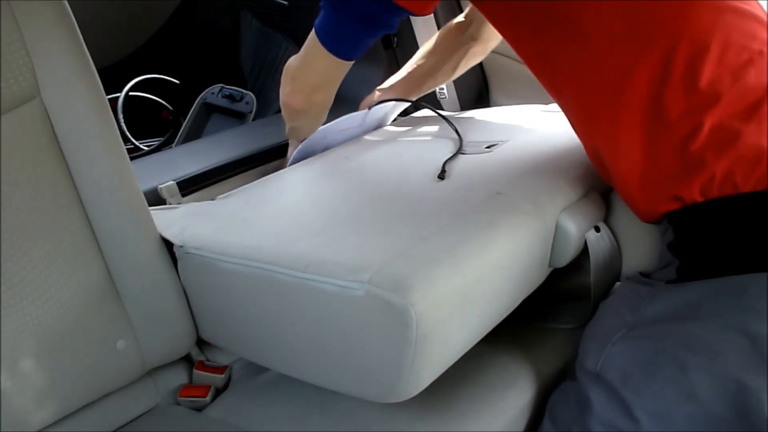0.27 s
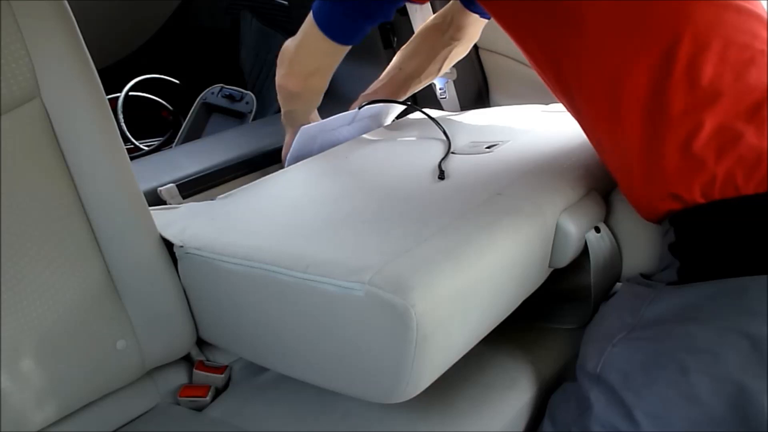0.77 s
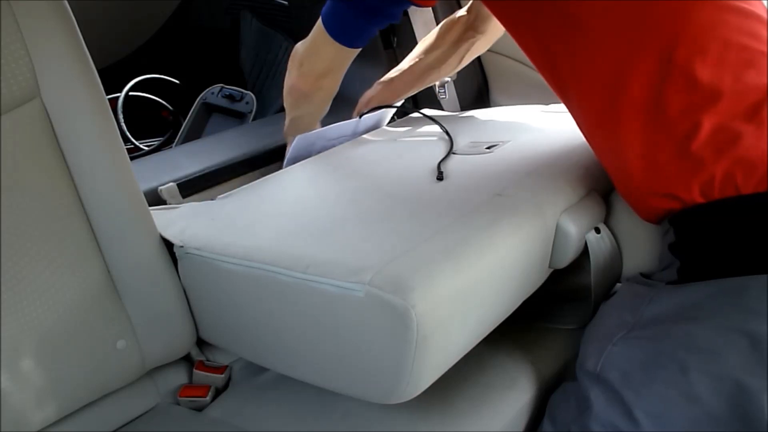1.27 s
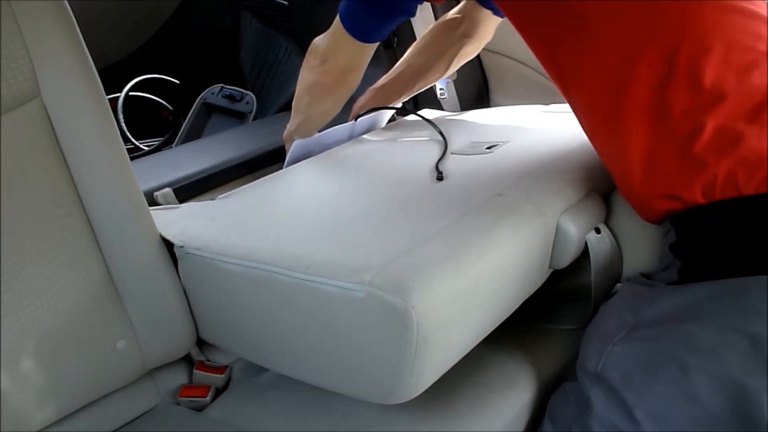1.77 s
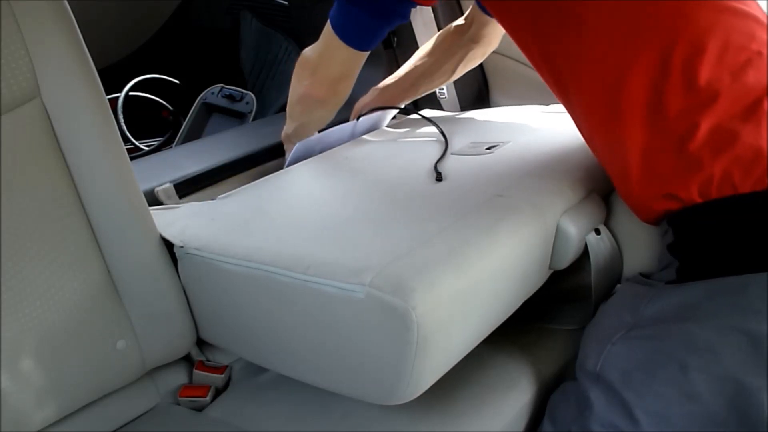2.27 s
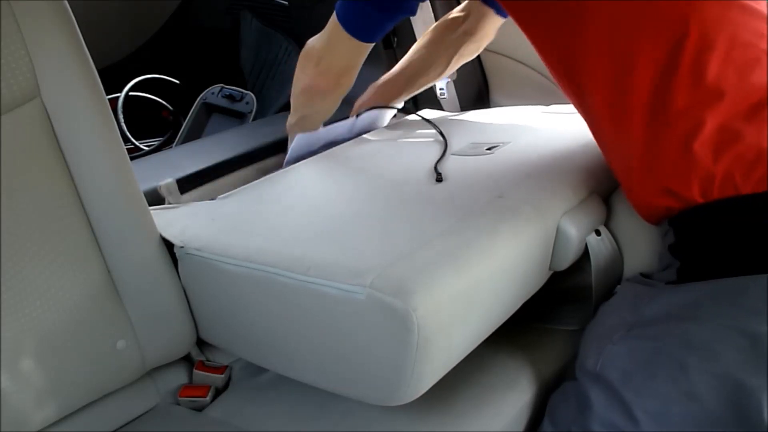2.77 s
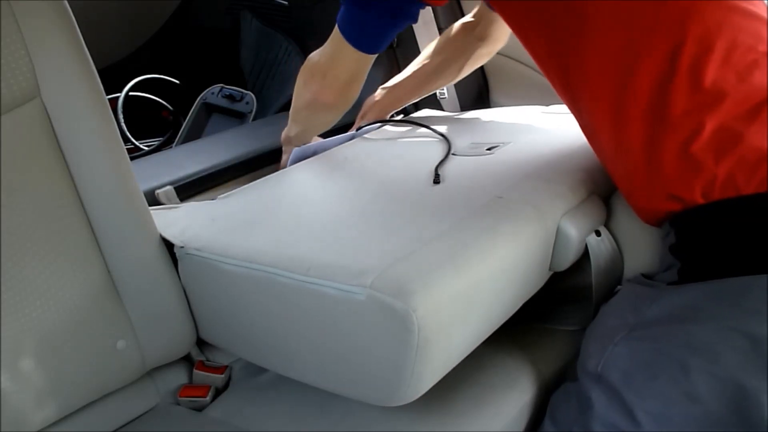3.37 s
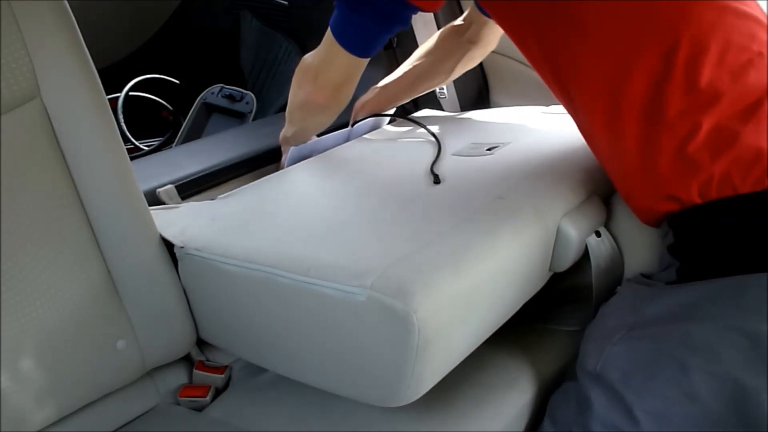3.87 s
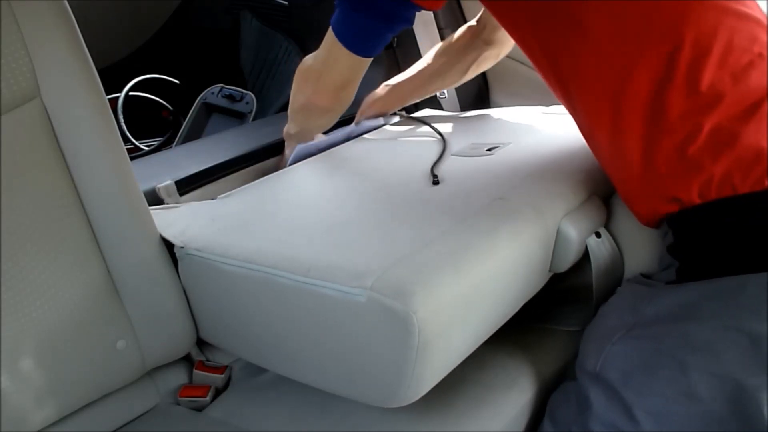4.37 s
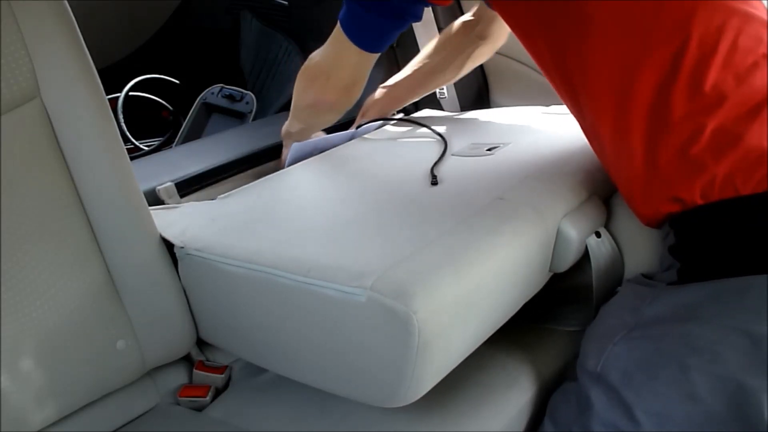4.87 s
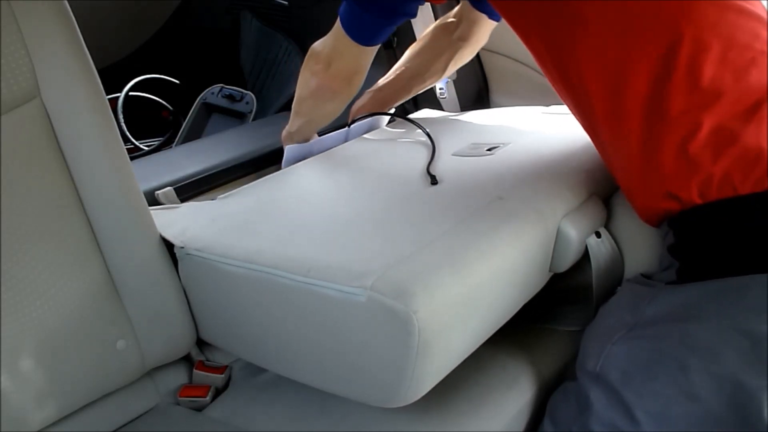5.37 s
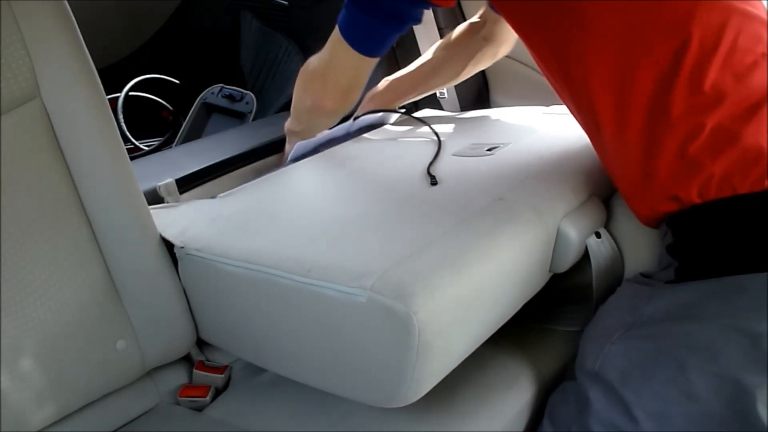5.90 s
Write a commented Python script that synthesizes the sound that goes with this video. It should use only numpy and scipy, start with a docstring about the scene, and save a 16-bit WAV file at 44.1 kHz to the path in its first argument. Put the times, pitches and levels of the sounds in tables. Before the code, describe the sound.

Cloth rubs and rustles over foam in quick strokes, with scattered bumps and plastic clacks over a low car cabin rush.

```python
"""Inside a parked car, hands work a padded heating element under the fabric cover of a seat.
From the start, short shoves drag cloth over foam with a swish and a dull rumble. Early on the seat is
bumped often: the cushion thuds, its plastic trim clacks and small parts tick. Between about 1 and 3 s,
fingers zip over the weave now and then. The hardest knock comes at 4.4 s and another strong one at 6 s,
just before the end. A steady low rush and hiss fill the cabin throughout."""
import sys
import numpy as np
from scipy import signal
from scipy.fft import rfft, irfft, next_fast_len
from scipy.io import wavfile

SR = 44100
rng = np.random.default_rng(int(sys.argv[2]) if len(sys.argv) > 2 else 0)


def digitize_waveform(pressure):
    """Quantize a signal to 16-bit integers and store it at the path in sys.argv[1].

    Rows of a 2-D input are taken as channels; values are limited to [-1, 1].
    """
    field = np.atleast_2d(pressure).T
    bounded = np.clip(field, -1, 1)
    quanta = np.round(bounded * 32767).astype(np.int16)
    wavfile.write(sys.argv[1], SR, quanta)


N = 270774
TIME = np.arange(N) / SR

# Levels are relative: the functions add their own gains. t60 is the time a sound takes to fade by 60 dB.
# shoves of the pad: start/s, end/s, fastest point/share of the shove, swish/dB, rumble/dB
SHOVES = [(-0.05, 0.106, 0.58, -48.5, -44), (0.159, 0.292, 0.54, -50.5, -45),
          (0.351, 0.476, 0.49, -57.5, -54), (0.453, 0.676, 0.14, -57.5, -51),
          (0.663, 0.824, 0.48, -53, -46.5), (0.84, 0.949, 0.74, -54.5, -55), (0.975, 1.135, 0.59, -53, -44),
          (1.145, 1.27, 0.37, -59, -45), (1.26, 1.434, 0.56, -57, -48.5), (1.46, 1.617, 0.5, -56, -57),
          (1.556, 1.747, 0.55, -55.5, -49), (1.783, 1.919, .3, -51.5, -49.5),
          (1.942, 2.141, 0.56, -51, -47), (2.151, 2.265, 0.59, -52.5, -47.5),
          (2.283, 2.467, 0.25, -52.5, -57), (2.467, 2.554, 0.64, -52.5, -56.5),
          (2.576, 2.685, 0.76, -52, -50.5), (2.734, 2.911, 0.56, -48, -48.5),
          (2.902, 2.984, 0.35, -57.5, -46.5), (3.029, 3.199, 0.75, -49.5, -50.5),
          (3.228, 3.32, 0.45, -52.5, -52), (3.349, 3.466, 0.46, -50, -45.5),
          (3.504, 3.586, 0.61, -50.5, -49.5), (3.618, 3.733, 0.59, -51, -46), (3.75, 3.853, 0.73, -56, -48),
          (3.869, 3.978, 0.62, -54.5, -46), (4.01, 4.112, 0.75, -60.5, -61), (4.16, 4.245, 0.44, -57, -50),
          (4.277, 4.39, 0.46, -52, -50), (4.34, 4.53, 0.46, -51, -46.5), (4.585, 4.785, 0.46, -56.5, -48),
          (4.83, 5.007, 0.67, -53, -50.5), (5.067, 5.153, 0.53, -55, -49.5), (5.177, 5.3, 0.41, -54.5, -47),
          (5.397, 5.554, 0.8, -63.5, -52), (5.568, 5.676, 0.72, -56, -55.5), (5.704, 5.786, 0.55, -54, -50),
          (5.849, 6.009, 0.57, -51, -52), (6.001, 6.064, 0.55, -53.5, -56),
          (6.066, 6.187, 0.39, -53.5, -59)]
# tone of the sliding cloth: f/Hz, level/dB
CLOTH_SPECTRUM = [(250, -14.5), (450, 3), (650, 9), (900, 3.5), (1300, 1), (2000, 0), (2800, -1),
                  (3300, -2), (4300, -2.5), (5300, -5), (6500, -7), (7600, -21.5)]
# tone of the foam and frame rumbling under the hands: f/Hz, level/dB
FOAM_SPECTRUM = [(32, -32.5), (50, -14.5), (90, 1.5), (140, -4), (200, 3.5), (280, 0.5), (400, -4.5),
                 (700, -16)]
# bumps against the seat: t/s, thud f/Hz, thud/dB, trim clack/dB, cloth snap/dB, deep boom/dB,
# hardness of the contact/(dB per octave), ring time/multiple of the usual
SEAT_BUMPS = [(0.007, 211, -36.5, -69, -63, -38, -6.5, 1.0), (0.034, 78.5, -42, -59, -50, -35.5, -5, 1.0),
              (0.1092, 180, -45, -49, -43.5, -51, 12, 0.9), (0.225, 198, -47.5, -57, -62, -48, -4, 1.0),
              (0.43, 193, -46.5, -58, -67, -50, -1, .8), (0.473, 191, -44, -42, -48.5, -40.5, -3, 1.0),
              (0.575, 201, -39.5, -48, -70, -38, -3, .8), (0.751, 209, -40, -50, -47, -36.5, -8.5, 1.3),
              (0.938, 191, -43, -62, -78, -59, -4, 1.2), (1.01, 209, -40.5, -62, -60, -48.5, -2, 1.4),
              (1.081, 184, -40.5, -64, -50.5, -51, 1, 1.0), (1.185, 187, -34.5, -40, -48, -33.5, 2.5, .85),
              (1.212, 184, -40, -40, -52, -43, 8, .8), (1.2225, 187, -43, -51, -53, -48, 1, .8),
              (1.3305, 180, -36, -48, -46, -32.5, 6.5, 1.15), (1.3323, 235, -42, -33, -54, -46, 5, .55),
              (1.341, 236, -48, -52, -51, -52.5, 7, .8), (2.341, 196, -42.5, -43.5, -48, -50, -5, .8),
              (2.423, 183, -41.5, -40.5, -51, -37.5, 4, .6), (2.841, 222, -42.5, -60, -66, -47, -2, 1.2),
              (2.881, 190.7, -32.5, -45, -65, -33.5, -13, 1.0), (2.889, 140, -39, -60, -68, -42, -7, .8),
              (3.686, 178, -44.5, -45, -58, -52, 4, 1.0), (3.963, 194.4, -41.5, -49, -41.5, -39.5, 3, 1.0),
              (4.4192, 197, -25, -21, -44, -43, -2, .42), (4.436, 201, -48, -33, -58, -50, 1, .55),
              (4.443, 186, -36, -36, -46, -42, -1, .45), (5.315, 137, -51, -63, -60, -43, -8, 1.4),
              (5.931, 188, -44, -50, -59, -41.5, -4, .7), (6.0341, 198, -27, -41, -46, -28, -5, 1.1),
              (6.036, 116, -40, -29.5, -56, -41, 4, .6), (6.062, 200, -41, -45.5, -62, -40, 0, .7)]
# ringing tones of the cushion on its frame: f/multiple of the thud pitch, level/dB, usual t60/s
CUSHION_TONES = [(.47, -26.5, 0.15), (.65, -8, 0.15), (1.0, 3, 0.13), (1.22, -10, 0.22), (1.76, -2, 0.096)]
# ringing tones of the plastic trim: f/Hz, level/dB, usual t60/s
TRIM_TONES = [(458, -5.5, 0.05), (523, -3, 0.059), (604.7, 1.5, 0.081), (670, -6, 0.054), (790, -5, 0.059),
              (910, -5.5, 0.041), (1110, -7, 0.03), (1345, -7.5, 0.031), (1590, -10.5, 0.039),
              (1800, -9, 0.02)]
# tone of a bump's cloth snap, cabin boom and trim rattle: f/Hz, level/dB
SNAP_SPECTRUM = [(1000, 2), (2500, 0), (3600, -2), (5300, 0), (7600, -8)]
BOOM_SPECTRUM = [(38, -16), (60, -2.0), (90, 9.5), (125, 5.0), (200, 0.0), (400, -10.0)]
RATTLE_SPECTRUM = [(300, -2.5), (600, 6.0), (900, -8.5), (1800, -17.5)]
# light ticks of hard plastic parts: t/s, f/Hz, level/dB, t60/s
PLASTIC_TICKS = [(0.1106, 3360, -31.5, 0.0029), (0.477, 2860, -42, 0.008), (0.755, 2760, -45, 0.02),
                 (1.068, 2250, -43.5, .03), (1.212, 3360, -43, 0.02), (1.331, 2110, -32, 0.004),
                 (1.3313, 5400, -42, 0.006), (1.336, 2600, -35, 0.0075), (2.4178, 2070, -41, 0.045),
                 (2.4203, 1170, -32, 0.0071), (2.882, 1310, -35, 0.012), (2.949, 2390, -44.5, 0.042),
                 (4.4197, 2790, -34.5, .012), (4.419, 5150, -34.5, 0.011), (4.4199, 1310, -28.5, 0.018),
                 (4.42, 1720, -34, .012), (6.0345, 1720, -34.5, 0.012), (6.039, 1800, -38, 0.01),
                 (6.0995, 3300, -46, .007)]
# fingers zipping over the ribs of the weave: start/s, end/s, middle f/Hz, level/dB
FINGER_ZIPS = [(0.878, 0.948, 3980, -56.5), (1.043, 1.12, 6460, -57), (1.797, 1.887, 6700, -64),
               (2.328, 2.37, 4440, -53), (2.606, 2.673, 4450, -51), (2.904, 2.98, 6080, -56.5)]
# how alike the seat sounds on the left and right: f/Hz, likeness (0 = unrelated, 1 = the same)
SEAT_LIKENESS = [(60, 0.99), (200, 1), (360, 0.94), (660, 0.98), (1200, 0.42), (2200, 0.51), (4000, 0.48),
                 (7200, 0.78)]
# tone of the cabin background: f/Hz, level/dB
RUSH_SPECTRUM = [(28, -28), (45, -11), (90, -11), (190, -1), (290, -4.5), (450, -7.5), (620, -11.5),
                 (1080, -15), (1300, -21.5), (2100, -20), (3200, -23.5), (4400, -27), (6000, -28.5),
                 (7600, -35)]
# how alike the background sounds on the left and right: f/Hz, likeness
RUSH_LIKENESS = [(60, 0.89), (200, 0.97), (400, 0.86), (800, 0.043), (2000, 0.94), (4000, 0.28),
                 (7200, 0.15)]


def hand_motion(fullness=0.68, usual_db=-52, usual_tilt=1.3, tilt_per_db=0.05):
    """Each shove speeds up and stops again; a harder one sounds brighter."""
    swish_power, weighted_tilt, rumble_power = np.zeros((3, N))
    for start, end, fastest, swish_db, rumble_db in SHOVES:
        peak_s = start + np.clip(fastest, .05, .95) * (end - start)
        speed = np.sin(np.pi / 2 * np.interp(TIME, [start, peak_s, end], [0, 1, 0])) ** fullness
        power = (speed * from_db(swish_db)) ** 2
        swish_power += power
        weighted_tilt += power * (usual_tilt + tilt_per_db * (swish_db - usual_db))
        rumble_power += (speed * from_db(rumble_db)) ** 2
    brightness = weighted_tilt / (swish_power + 1e-12)   # dB per octave
    return np.sqrt(swish_power), brightness, np.sqrt(rumble_power)


def cloth_swish(strength, brightness, gain_db=3.0, catch_db=0.88, folds_db=2.5, pivot_hz=3200):
    """Fibres slip; the weave catches and frees, folds shift the tone, and taut cloth sounds brighter."""
    centres, bands = fibre_slips(CLOTH_SPECTRUM, SEAT_LIKENESS)
    swish = 0
    for hz, fibres in zip(centres, bands):
        octaves = np.clip(np.log2(hz / pivot_hz), -1, 1)
        swish += fibres * from_db(brightness * octaves + folds_db * drift(per_s=28))
    catching = from_db(gain_db + catch_db * drift(per_s=70))
    return swish * strength * catching * pan(left_db=3.0)


def fibre_slips(spectrum, likeness, grain_db=0.5, count=24):
    """Many tiny, uneven slips blend into noise, split here into narrow bands from low to high."""
    edges = np.geomspace(spectrum[0][0], spectrum[-1][0], count + 1)
    centres = np.sqrt(edges[:-1] * edges[1:])
    sizes = np.clip(rng.standard_normal(N), -2, 2)[np.arange(N) // 32]   # each lasts 32 samples
    slips = rng.standard_normal((2, 2, N)) * from_db(grain_db * sizes)
    bands = []
    for k, hz in enumerate(centres):
        mid, side = band(slips[k % 2], edges[k], edges[k + 1])   # neighbours use different noise
        bands.append(from_db(at_hz(spectrum, hz)) * stereo(mid, side, at_hz(likeness, hz)))
    return centres, np.array(bands) / np.std(sum(bands))


def foam_rumble(strength, lumpy_db=2.0):
    """The drag shakes the cushion in uneven lumps."""
    return steady_noise(FOAM_SPECTRUM, SEAT_LIKENESS) * strength * from_db(lumpy_db * drift(per_s=25))


def seat_bumps(thud_gain_db=5.0, clack_gain_db=0.5, rattle_gain_db=1.5):
    """A bump snaps the cloth, rings the trim and, more slowly, the cushion; the cabin booms briefly."""
    out = np.zeros((2, N))
    snap = steady_noise(SNAP_SPECTRUM, SEAT_LIKENESS) * pan(left_db=2.3)
    boom = steady_noise(BOOM_SPECTRUM, SEAT_LIKENESS)
    rattle = steady_noise(RATTLE_SPECTRUM, SEAT_LIKENESS)
    for start, thud_hz, thud_db, clack_db, snap_db, boom_db, hardness, ring_time in SEAT_BUMPS:
        span, age = after(start)
        loose = max(ring_time, .3)   # smaller when a hand on the seat cuts the ringing short
        cushion = 0
        for k, (ratio, db, t60) in enumerate(CUSHION_TONES):
            gain = (-1) ** k * from_db(db + hardness * np.log2(ratio))   # every other tone is flipped
            cushion += gain * ring(age, thud_hz * ratio, t60 * loose)
        # the trim's tones start together, giving a hollow clack
        trim = sum(from_db(db) * ring(age, hz, t60 * loose) for hz, db, t60 in TRIM_TONES)
        snap_shape = from_db(4.0) * burst(age, rise_s=.0009, t60=.018)   # sharp crack
        snap_shape += from_db(2.5) * burst(age, rise_s=0.005, t60=0.052 * loose)   # softer tail
        rattle_shape = burst(age, rise_s=0.0019, t60=0.093 * loose)
        out[:, span] += from_db(thud_db + thud_gain_db) * cushion * swell(age, rise_s=0.0036 * loose)
        out[:, span] += from_db(clack_db + clack_gain_db) * trim * swell(age, rise_s=0.0016)
        out[:, span] += from_db(snap_db) * snap[:, span] * snap_shape
        out[:, span] += from_db(boom_db) * boom[:, span] * burst(age, rise_s=0.018, t60=0.2 * loose)
        out[:, span] += from_db(clack_db + rattle_gain_db) * rattle[:, span] * rattle_shape
    return out


def plastic_ticks(upper_db=-7):
    """A small part rings briefly with a main tone and a weaker, shorter one just above it."""
    out = np.zeros(N)
    for start, hz, db, t60 in PLASTIC_TICKS:
        span, age = after(start)
        upper = from_db(upper_db) * ring(age, hz * 1.1, t60 / 2)
        out[span] += from_db(db) * (ring(age, hz, t60) + upper)
    return out * pan(left_db=2.3)


def finger_zips(width_hz=950, fall_octaves=0.9):
    """A finger crossing the weave gives a narrow band of noise whose pitch falls as it slows."""
    out = np.zeros(N)
    blur = drift(2 * width_hz) + 1j * drift(2 * width_hz)   # smears a pure tone into noise
    for start, end, middle_hz, db in FINGER_ZIPS:
        progress = np.interp(TIME, [start, end], [0, 1])
        hz = middle_hz * 2 ** (fall_octaves * (.5 - progress))
        phase = 2 * np.pi * np.cumsum(hz) / SR
        out += from_db(db) * np.sin(np.pi * progress) * np.real(blur * np.exp(1j * phase))
    return out * pan(left_db=0.89)


def cabin_rush(gain_db=-48.0, lag_s=0.00018):
    """A steady rush and hiss come from the right, so they reach the left side a moment later."""
    left, right = steady_noise(RUSH_SPECTRUM, RUSH_LIKENESS)
    late_left = np.interp(TIME - lag_s, TIME, left)
    return from_db(gain_db) * np.array([late_left, right])


def steady_noise(spectrum, likeness):
    """Stereo noise with the tone of a table, falling away steeply beyond the table's ends."""
    size = next_fast_len(N, True)
    hz = np.maximum(np.fft.rfftfreq(size, 1 / SR), 1)
    low_cut = 1 + (spectrum[0][0] / hz) ** 8
    high_cut = 1 + (hz / spectrum[-1][0]) ** 16
    mid, side = rfft(rng.standard_normal((2, size)))
    noise = stereo(mid, side, at_hz(likeness, hz))
    shaped = noise * from_db(at_hz(spectrum, hz)) / np.sqrt(low_cut * high_cut)
    return rms_one(irfft(shaped, size)[:, :N])


def ring(age, hz, t60):
    """The fading tone of something struck."""
    return np.sin(2 * np.pi * hz * age) * from_db(-60 * age / t60)


def swell(age, rise_s):
    """A smooth rise from 0 towards 1."""
    return 1 - np.exp(-age / rise_s)


def burst(age, rise_s, t60):
    """A loudness curve that swells quickly and dies away."""
    return swell(age, rise_s) * from_db(-60 * age / t60)


def after(start):
    """The half second after a moment: its samples and their age in seconds."""
    span = slice(max(round(start * SR), 0), round((start + .5) * SR))
    return span, TIME[span] - TIME[span][0]


def drift(per_s):
    """A random wander with a typical size of 1."""
    points = rng.standard_normal(20000)
    return rms_one(np.interp(TIME * per_s, np.arange(len(points)), points))


def band(x, low_hz, high_hz):
    """Let through mainly the sound between two frequencies."""
    return signal.sosfilt(signal.butter(2, [low_hz, high_hz], "band", fs=SR, output="sos"), x + 1e-18)


def stereo(mid, side, alike):
    """Mix two unrelated noises into left and right channels with a given likeness."""
    alike = np.clip(alike, -1, 1)
    return np.sqrt((1 + alike) / 2) * mid + np.sqrt((1 - alike) / 2) * side * [[1], [-1]]


def pan(left_db):
    """Two gains that put the left channel left_db above the right."""
    return from_db(np.array([[left_db], [-left_db]]) / 2)


def at_hz(table, hz):
    """Read between a table's rows, with octaves evenly spaced."""
    row_hz, values = np.array(table).T
    return np.interp(np.log(hz), np.log(row_hz), values)


def rms_one(x):
    """Scale a signal so its typical size (rms) is 1."""
    return x / np.sqrt(np.mean(x ** 2) + 1e-20)


def from_db(db):
    """Turn decibels into a gain."""
    return 10 ** (np.asarray(db) / 20)


def scene():
    """Rubbing, ticks and bumps over the steady cabin background."""
    swish_strength, brightness, rumble_strength = hand_motion()
    cabin = cabin_rush()
    bright_sounds = cloth_swish(swish_strength, brightness) + finger_zips() + plastic_ticks()
    deep_sounds = foam_rumble(rumble_strength) + seat_bumps() + cabin
    return bright_sounds + deep_sounds * pan(left_db=-.8)


def record(dry, cutoff_hz=7520):
    """The highest treble is cut off steeply."""
    return signal.sosfilt(signal.ellip(10, .2, 70, cutoff_hz, fs=SR, output="sos"), dry)


dry = scene()
out = record(dry)
digitize_waveform(out)
```